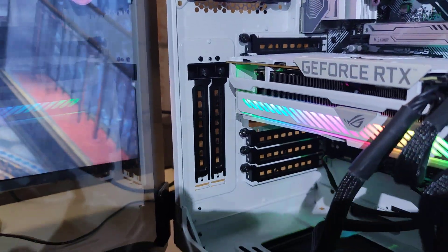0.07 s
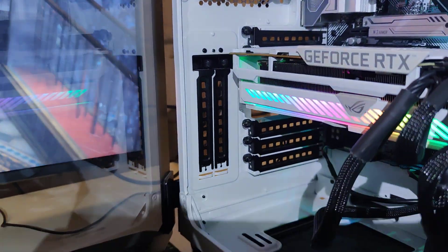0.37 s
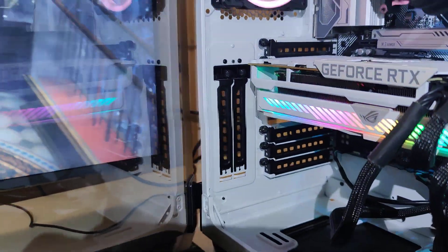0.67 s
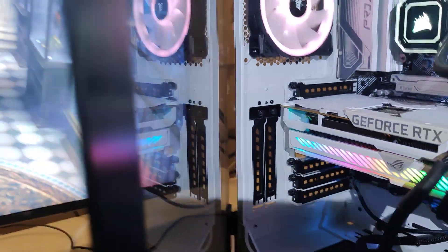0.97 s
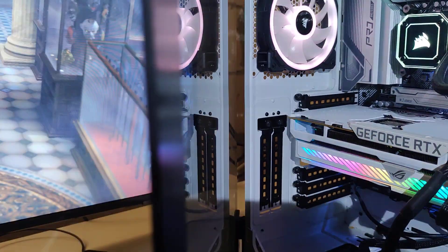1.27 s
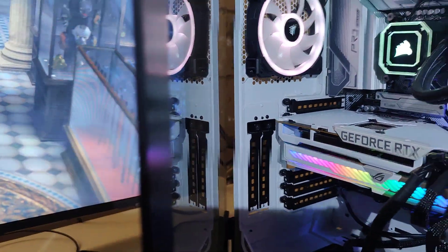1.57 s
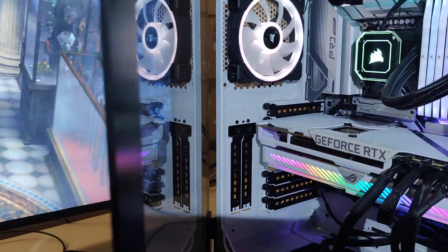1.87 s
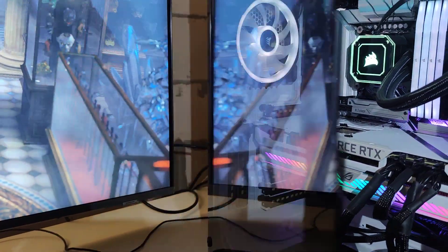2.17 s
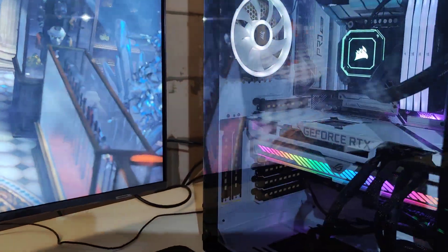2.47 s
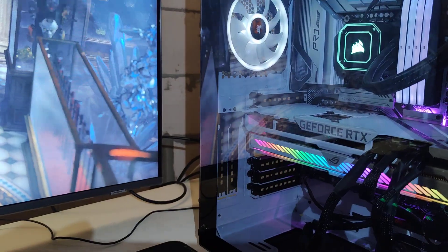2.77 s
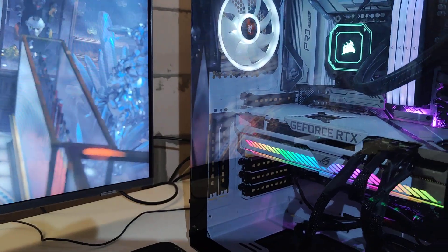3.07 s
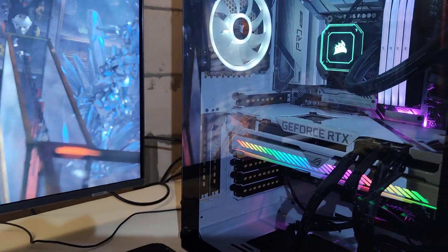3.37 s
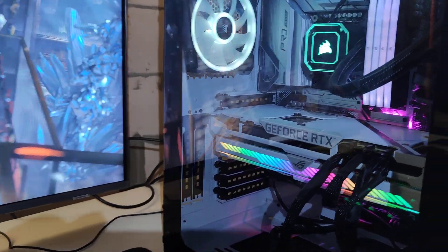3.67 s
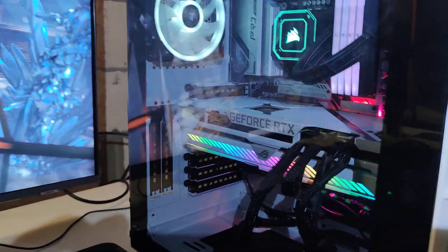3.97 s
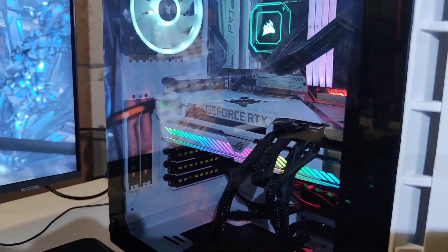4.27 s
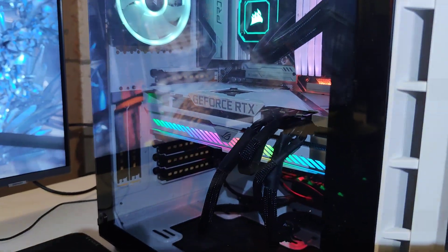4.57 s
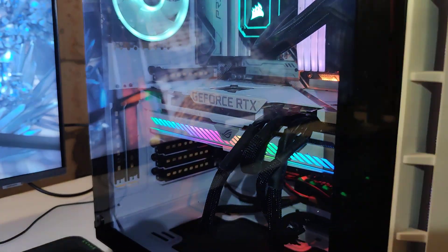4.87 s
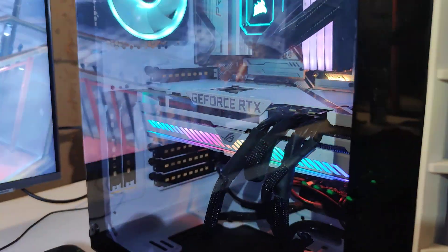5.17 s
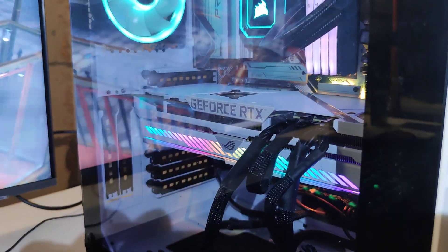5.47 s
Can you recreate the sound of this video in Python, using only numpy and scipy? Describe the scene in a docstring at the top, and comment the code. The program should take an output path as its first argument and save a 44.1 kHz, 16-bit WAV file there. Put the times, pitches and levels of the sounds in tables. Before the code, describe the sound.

From the start, a desktop computer's fans give a quiet, steady low hum and a soft rush of air in a small room. A hand rubs faintly on the glass side panel at about 0.7 seconds. Tiny hinge ticks and another faint rub come near 2 seconds, then the air noise dulls as the pane swings in, with a clearer cluster of ticks at 2.8 seconds. At about 3.4 seconds the pane slams on the steel frame, by far the loudest sound: a thud with a sharp click and very quick bounces. The case rattles and rings briefly, and a deep glass wobble fades over a second. Soft hand knocks and a rub follow around 4 seconds, with one faint bump near 4.7. The hum continues until the end at 5.5 seconds. Everything sits on the left; the right carries only faint, dull microphone noise.

```python
"""Fan hum and rushing air from a desktop computer in a small room, then its glass side panel slams.
The hinge ticks and the air noise dulls as the pane swings shut. The pane thuds on the steel frame and
bounces: the case rattles and rings, the glass wobbles, and the hand lets go with soft knocks and rubs.
All of this is on the left; the right channel carries only dull microphone noise."""
import sys
import numpy as np
from scipy import signal
from scipy.fft import rfft, irfft, next_fast_len
from scipy.io import wavfile
from scipy.ndimage import uniform_filter1d

SR = 44100
rng = np.random.default_rng(int(sys.argv[2]) if len(sys.argv) > 2 else 0)


def store_pcm(level_fs):
    """Save levels as 16-bit WAV."""
    pcm = np.round(np.clip(level_fs, -1, 1) * 32767).astype(np.int16)
    wavfile.write(sys.argv[1], SR, np.atleast_2d(pcm).T)


N = 243431
TIME_S = np.arange(N) / SR
RING_S = TIME_S[:SR]

# pane hitting the frame and bouncing: (time [s], level [dB], contact corner [Hz])
PANE_CONTACTS = [(3.4292, -28, 1090), (3.4320, -22.5, 1000), (3.4436, -29, 4426), (3.4573, -31.5, 990),
                 (3.4717, -35.5, 850)]


def undb(db):
    """Decibels to gain."""
    return 10 ** (np.asarray(db) / 20)


def on_log_axis(points, hz):
    """Interpolate (frequency [Hz], value) points over log frequency."""
    point_hz, value = np.transpose(points)
    return np.interp(np.log(np.maximum(hz, 1)), np.log(point_hz), value)


def colour(x, points):
    """Minimum-phase filter through (frequency [Hz], gain [dB]) points."""
    size = 2 * next_fast_len(len(x))
    gain = undb(on_log_axis(points, np.fft.rfftfreq(size, 1 / SR)))
    cepstrum = irfft(np.log(gain))
    cepstrum[1:size // 2] *= 2
    cepstrum[size // 2 + 1:] = 0
    return irfft(rfft(x, size) * np.exp(rfft(cepstrum)))[:len(x)]


def edge(x, hz, kind, order=2):
    """Butterworth low-pass or high-pass."""
    return signal.sosfilt(signal.butter(order, hz, kind, fs=SR, output="sos"), x)


def fade(t60_s):
    """Exponential decay, 1 s long."""
    return np.exp(-np.log(1000) * RING_S / t60_s)


def swell(mid_s, half_s):
    """Gaussian rise and fall."""
    return np.exp(-((TIME_S - mid_s) / half_s) ** 2)


def unit(x):
    """Scale to unit energy."""
    return x / np.sqrt(np.sum(x ** 2))


def burst(x, db):
    """Scale to the energy of 10 ms at this level."""
    return unit(x) * undb(db) * np.sqrt(SR / 100)


def add(track, at_s, x):
    """Mix x into the track."""
    start = int(at_s * SR)
    track[start:start + len(x)] += x[:N - start]


def velvet_noise(slot_samples=4):
    """1 s of dense impulses, one of random sign per slot."""
    x = np.zeros(SR)
    starts = np.arange(0, SR - slot_samples, slot_samples)
    x[starts + rng.integers(0, slot_samples, len(starts))] = rng.choice([-1, 1], len(starts))
    return x


def hiss(points):
    """Steady noise from (frequency [Hz], density [dB/Hz]) points."""
    return colour(rng.standard_normal(N), points) * np.sqrt(SR / 2)


def walk(rate_hz):
    """Smooth random wander, unit deviation."""
    hold = int(SR / rate_hz)
    steps = np.repeat(rng.standard_normal(N // hold + 1), hold)
    smooth = uniform_filter1d(uniform_filter1d(steps, hold), hold)[:N]
    return smooth / smooth.std()


def mic_noise():
    """Dull self-noise of the right microphone."""
    # (frequency [Hz], density [dB/Hz])
    noise_floor = [(10, -77.5), (25, -81.5), (50, -83.5), (100, -87.5), (200, -94), (500, -101.5),
                   (1000, -106.8), (2000, -111.3), (4000, -115.6), (6000, -119.3), (8500, -122.2),
                   (11000, -120.0), (14000, -118.1)]
    return hiss(noise_floor)


def room_noise():
    """Room rumble and hiss on the left."""
    # (frequency [Hz], density [dB/Hz])
    noise_floor = [(10, -77.5), (30, -83.5), (60, -90), (130, -97), (270, -95.5), (500, -103.8),
                   (1000, -108.1), (2000, -111.6), (4500, -115.3), (6500, -119.6), (8500, -122.8),
                   (11000, -120), (14000, -117.3)]
    return hiss(noise_floor)


def room_reverb(x, build_s=0.014):
    """Diffuse reflections build quickly and die sooner in the treble."""
    # decay per band: (frequency [Hz], t60 [s])
    bands = [(60, 0.98), (250, 0.52), (600, 0.42), (2000, 0.37), (4500, 0.25), (8000, 0.3), (14000, 0.2)]
    spectrum, hz = rfft(velvet_noise()), np.fft.rfftfreq(SR, 1 / SR)
    tail = 0
    for band_hz, t60_s in bands:
        share = on_log_axis([(point_hz, point_hz == band_hz) for point_hz, _ in bands], hz)
        tail = tail + irfft(spectrum * share, SR) * fade(t60_s)
    onset = 1 - np.exp(-(RING_S / build_s) ** 2)
    return signal.fftconvolve(x, unit(tail * onset))[:N]


def whistles(flutter_hz=45):
    """Faint narrow bands swell and fade in the rushing air."""
    # (middle [s], frequency [Hz], level [dB], half length [s])
    swells = [(.16, 4030, -82, .17), (1.4, 4610, -86, 0.42), (2.47, 2850, -82.5, 0.18)]
    out = 0
    for mid_s, hz, db, half_s in swells:
        flutter = edge(rng.standard_normal(N), flutter_hz, "low")
        tone = np.sqrt(2) * np.sin(2 * np.pi * hz * TIME_S)
        out = out + undb(db) * swell(mid_s, half_s) * tone * flutter / flutter.std()
    return out


def fans(blade_hz=306.8, drift=.003, swing_mid_s=2.42, swing_length_s=.65):
    """Blade-passing hum, third harmonic and air rush; the closing pane shuts in the last two."""
    # hum at the moving microphone: (time [s], level [dB])
    hum_levels = [(0, -68.3), (1, -69), (2.6, -71.5), (5.52, -68.3)]
    # air through the open case: (frequency [Hz], relative density [dB/Hz])
    rush_spectrum = [(200, -112), (500, -108), (1000, -110), (2000, -112.5), (3000, -116), (4600, -114),
                     (6000, -118), (8500, -128), (14000, -135)]
    shut = np.clip(.5 + (TIME_S - swing_mid_s) / swing_length_s, 0, 1)
    hum_db = np.interp(TIME_S, *np.transpose(hum_levels)) + 0.35 * walk(8.3)
    third_db = -81 - 11 * shut + 0.3 * walk(2.6)
    rush_gain_db = -1 - 9.5 * shut
    phase = 2 * np.pi * np.cumsum(blade_hz * (1 + drift * walk(9))) / SR
    hum, third = np.sqrt(2) * np.sin(np.outer([1, 3], phase))
    return undb(hum_db) * hum + undb(third_db) * third + undb(rush_gain_db) * hiss(rush_spectrum)


def hand_rubs(low_hz=900, high_hz=4800, uneven_db=2.0):
    """Skin slides over the pane in soft, uneven swells."""
    # (middle [s], level [dB], half length [s])
    slides = [(.72, -73.5, 0.14), (1.99, -79, .08), (4.05, -75, .16)]
    friction = edge(rng.standard_normal(N), low_hz, "high", order=1)
    friction = edge(friction, high_hz, "low", order=3)
    pressure = sum(undb(db) * swell(mid_s, half_s) for mid_s, db, half_s in slides)
    return pressure * undb(uneven_db * walk(40)) * friction / friction.std()


def hand_knocks(t60_s=0.12):
    """The hand bumps the case softly as it lets go."""
    # (time [s], level [dB], contact corner [Hz])
    bumps = [(3.9410, -50.5, 2400), (3.9530, -51.5, 3000), (3.9600, -50, 2470), (3.9880, -55, 1187),
             (4.657, -70.5, 698)]
    # hollow case response: (frequency [Hz], gain [dB])
    hollow = [(60, 6.5), (180, -11), (270, 7.5), (400, 1.5), (560, -6.5), (680, -0.5), (860, -6.5),
              (1030, 1), (1300, -9.5), (2500, -15.5), (5500, -13.5), (7000, -22)]
    out = np.zeros(N)
    for at_s, db, corner_hz in bumps:
        knock = colour(velvet_noise() * fade(t60_s), hollow)
        add(out, at_s, burst(edge(knock, corner_hz, "low"), db))
    return out


def ticks(t60_s=.034, low_hz=1300):
    """Hinge, catch and glass edge tick; returns their brief ring and bare cracks for the reverb."""
    # (time [s], level [dB], treble shelf [dB])
    contacts = [(1.937, -71.5, -17), (2.02, -65.5, -19), (2.7695, -59, -7), (2.7846, -51.5, 0.5),
                (2.7910, -55, -9), (3.2790, -64, -9), (3.4300, -47, -13), (3.4360, -35, -6),
                (3.4432, -24, -7.5), (3.4640, -37.5, -9.5), (3.5700, -52.5, -6.5), (3.959, -62.5, 7),
                (4.0, -68.5, -4), (4.017, -69, 3)]
    # glass and steel response: (frequency [Hz], gain [dB])
    response = [(300, -6), (1300, 0), (1900, -1.5), (2600, -3.5), (3300, -3), (4700, -2), (5700, -5),
                (6500, -13), (7400, -10), (8500, -21), (11500, -20), (13500, -17), (15000, -15)]
    rings, cracks = np.zeros(N), np.zeros(N)
    for at_s, db, treble_db in contacts:
        shelf = [(4700, 0.0093), (5700, treble_db)]
        for track, drive in ((rings, velvet_noise() * fade(t60_s)), (cracks, signal.unit_impulse(SR))):
            tick = colour(colour(drive, response), shelf)
            add(track, at_s, burst(edge(tick, low_hz, "high", order=3), db))
    return rings, cracks


def case_ring(build_cycles=5.0, offset_db=-12.5, db_per_octave=9, reference_hz=1000):
    """Steel sheets take up each blow over a few cycles; harder contacts ring them more."""
    # case modes: (frequency [Hz], relative resonance peak [dB], t60 [s])
    modes = [(233.4, 5.5, 0.34), (252.8, 4, 0.42), (284, -4, 0.32), (310, -6.5, 0.22), (367.6, -3, 0.24),
             (395, -19, 0.22), (427, -7, .27), (450.5, 0, 0.19), (470, -5.5, .27), (526, -1.5, 0.18),
             (574, -7.5, 0.16), (613.5, -11.5, 0.204), (747, -12.5, 0.252), (799, -6.5, 0.4), (871, -9, .3),
             (1186, -18, 0.35), (1287, -6.5, 0.17), (1326, -9, .2), (1674, -12, 0.24), (1986, -12.5, 0.18),
             (2700, -12, 0.16), (2964, -10.5, .2), (3860, -26, 0.13), (4418, -17.5, 0.26)]
    ring = 0
    for k, (hz, db, t60_s) in enumerate(modes):
        amplitude = (-1) ** k * undb(db) / t60_s
        onset = 1 - np.exp(-RING_S * hz / build_cycles)
        ring = ring + amplitude * np.sin(2 * np.pi * hz * RING_S) * fade(t60_s) * onset
    out = np.zeros(N)
    for at_s, db, corner_hz in PANE_CONTACTS:
        ring_db = db + offset_db + db_per_octave * np.log2(corner_hz / reference_hz)
        add(out, at_s, burst(edge(ring, corner_hz, "low"), ring_db))
    return out


def pane_wobble(start_s=3.428):
    """The pane flexes on after the slam; neighbouring modes start in opposite directions and beat."""
    # bending modes: (frequency [Hz], level [dB], t60 [s])
    modes = [(40.38, -33, 1.57), (47.76, -30.5, 1.45), (89, -52.5, .3), (99.7, -33.5, 0.71)]
    out = np.zeros(N)
    for k, (hz, db, t60_s) in enumerate(modes):
        amplitude = (-1) ** (k + 1) * undb(db)
        add(out, start_s, amplitude * np.sin(2 * np.pi * hz * RING_S) * fade(t60_s))
    return out


def pane_blows(rattle_t60_s=0.064, push_db=-7):
    """Each contact pushes the air and shakes loose case parts; softer contacts are duller."""
    # (frequency [Hz], gain [dB])
    rattle_spectrum = [(30, 2.5), (70, -5.5), (115, 5), (170, -16), (260, -4), (460, 3), (610, -1),
                       (740, -12), (980, -5), (1100, -14.5), (1330, -6.5), (1600, -10.5), (2700, -12),
                       (4500, -3), (7000, -29)]
    pulse = edge(signal.unit_impulse(SR), 470, "low")
    push = undb(push_db) * unit(edge(pulse, 45, "high", order=1))
    out = np.zeros(N)
    for at_s, db, corner_hz in PANE_CONTACTS:
        rattle = unit(colour(velvet_noise() * fade(rattle_t60_s), rattle_spectrum))
        add(out, at_s, burst(edge(rattle + push, corner_hz, "low"), db))
    return out


def scene(crack_send_db=-7, thud_send_db=-10.5):
    """Left: computer, panel and room. Right: microphone noise."""
    thuds = pane_blows() + hand_knocks()
    tick_rings, cracks = ticks()
    reverb = room_reverb(undb(crack_send_db) * cracks + undb(thud_send_db) * thuds)
    panel = thuds + tick_rings + case_ring() + pane_wobble() + reverb
    left = panel + hand_rubs() + fans() + whistles() + room_noise()
    return np.array([left, mic_noise()])


def record(dry, top_hz=14300):
    """Steep elliptic low-pass."""
    return signal.sosfilt(signal.ellip(10, .1, 70, top_hz, fs=SR, output="sos"), dry)


dry = scene()
out = record(dry)
store_pcm(out)
```